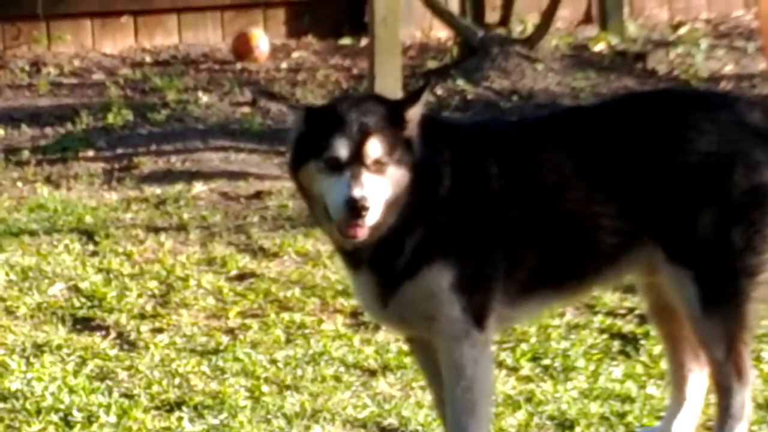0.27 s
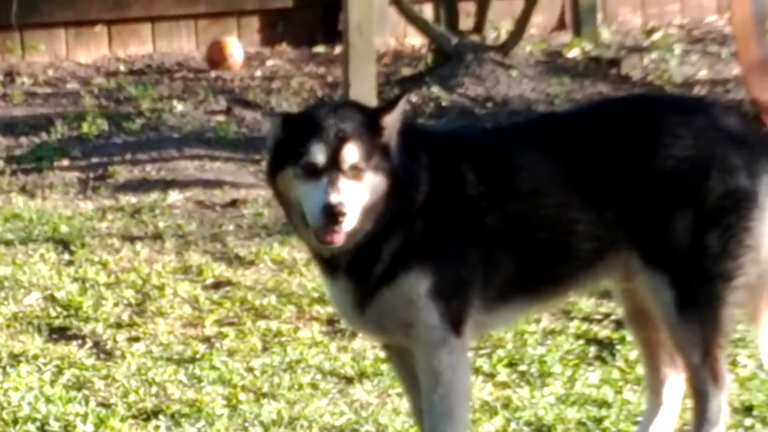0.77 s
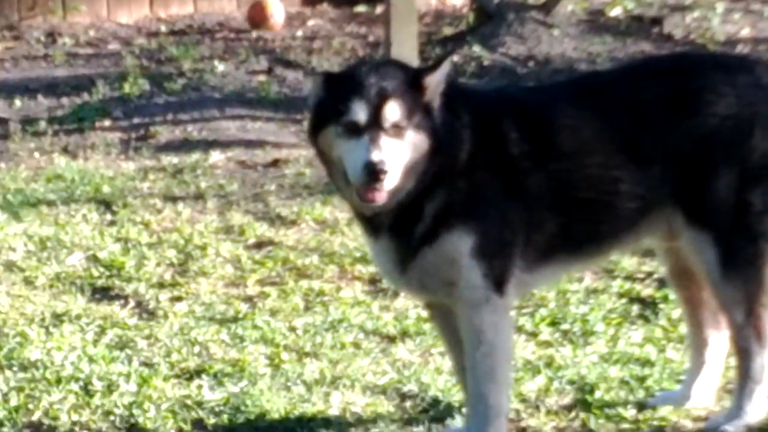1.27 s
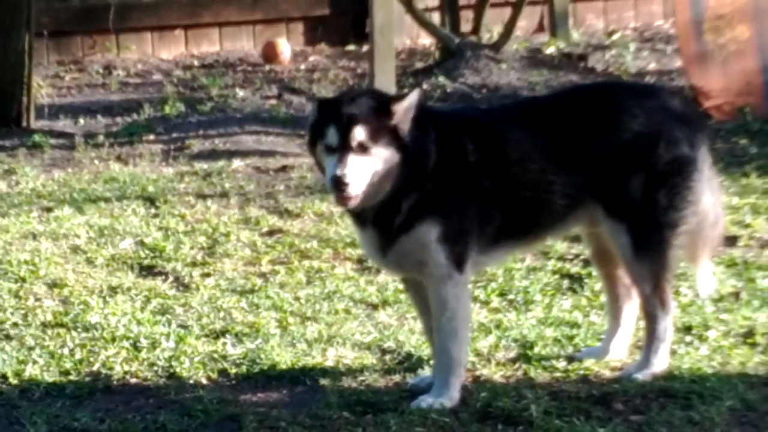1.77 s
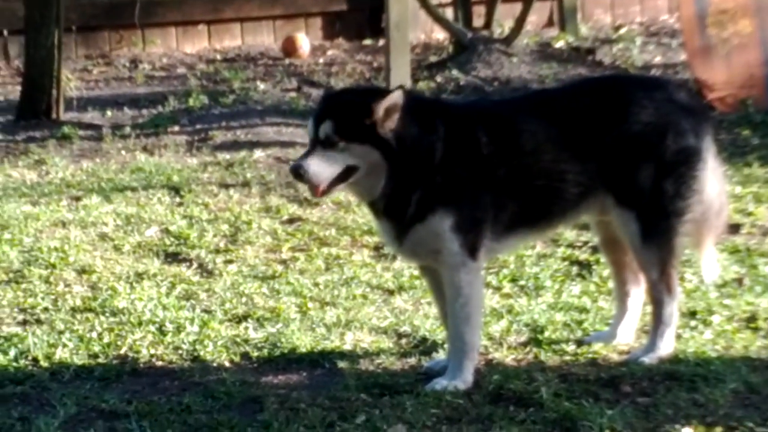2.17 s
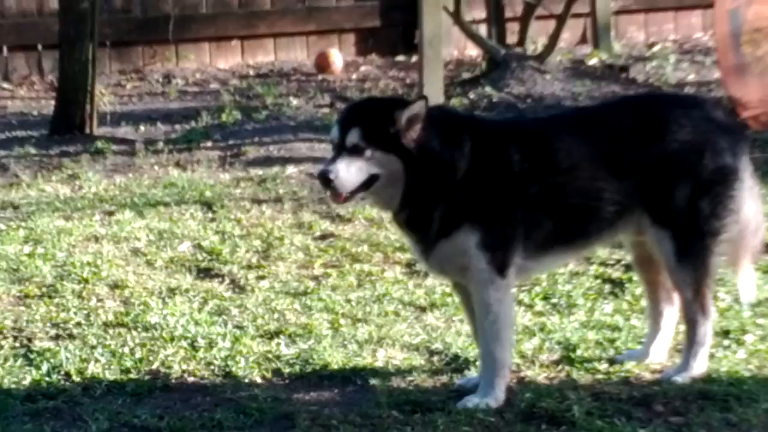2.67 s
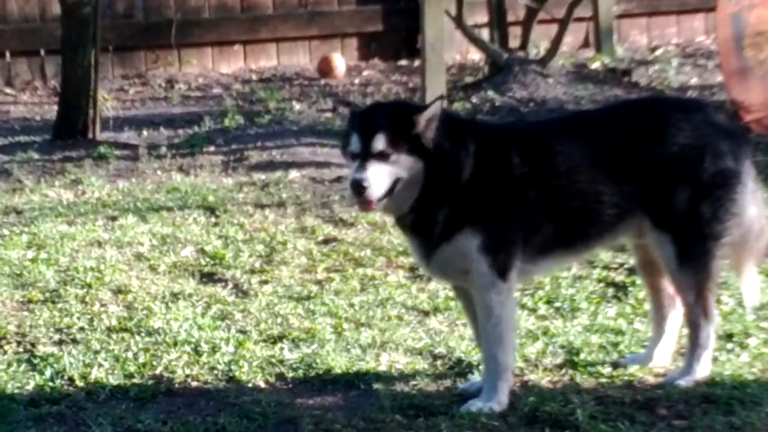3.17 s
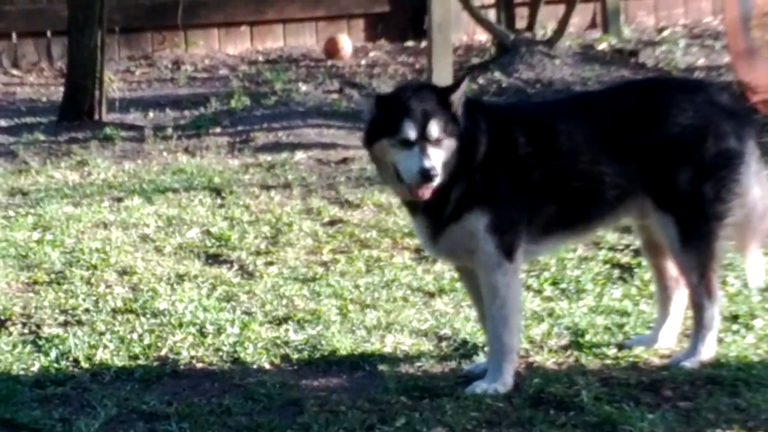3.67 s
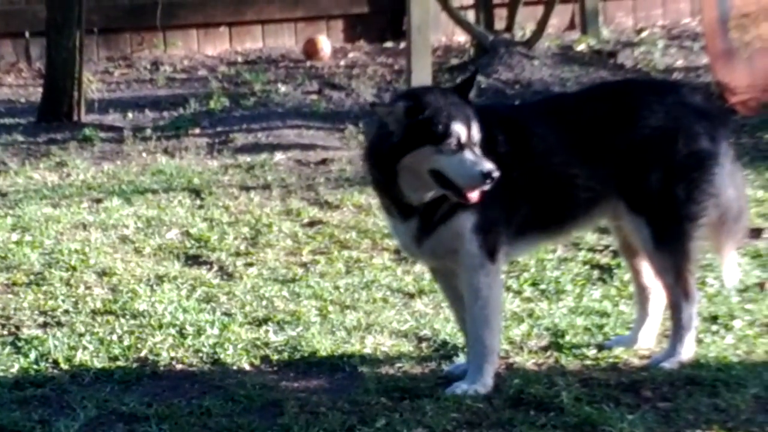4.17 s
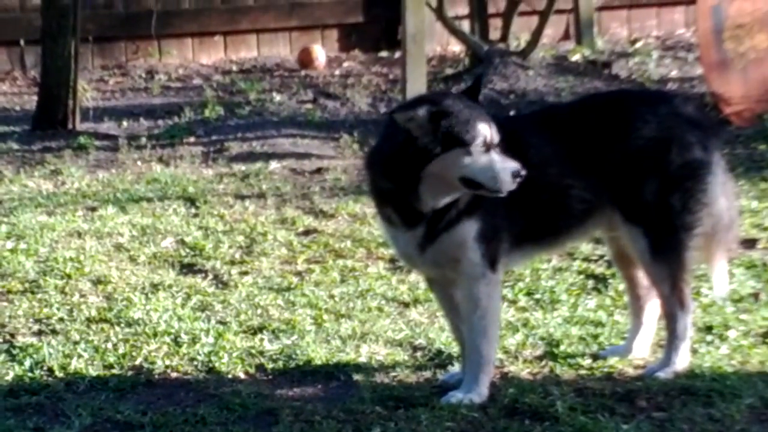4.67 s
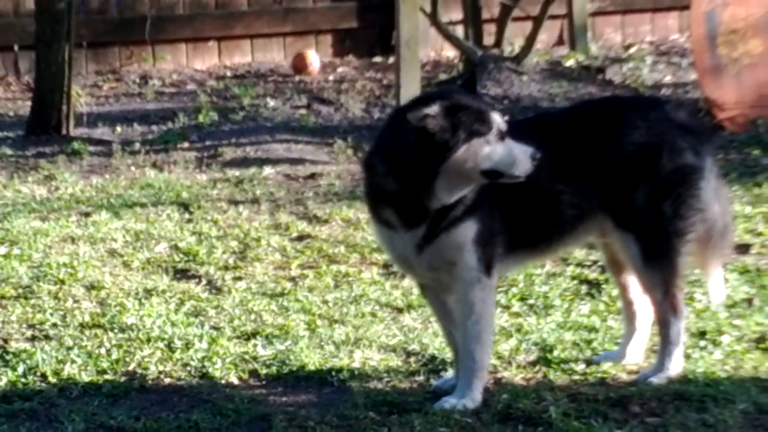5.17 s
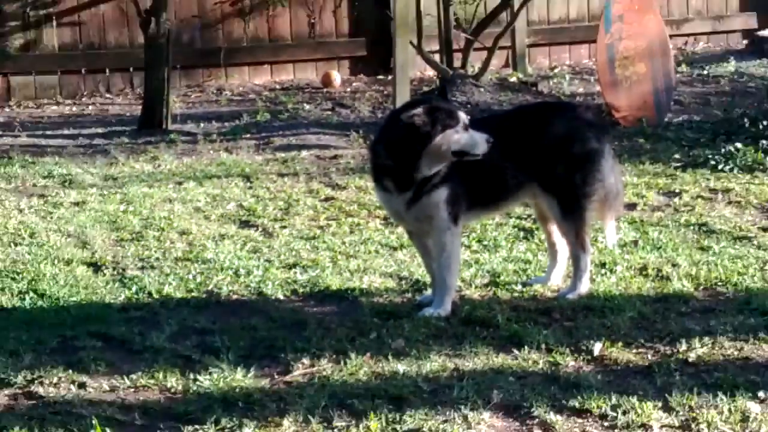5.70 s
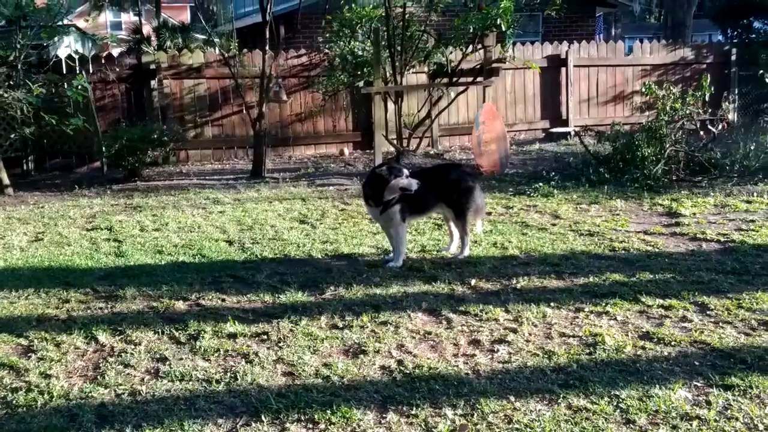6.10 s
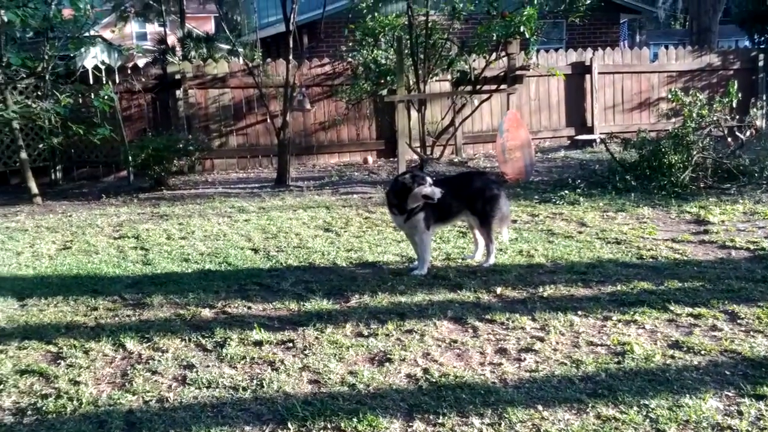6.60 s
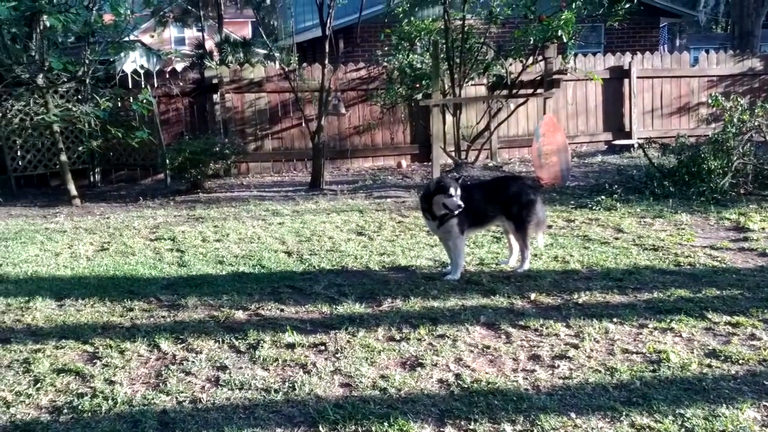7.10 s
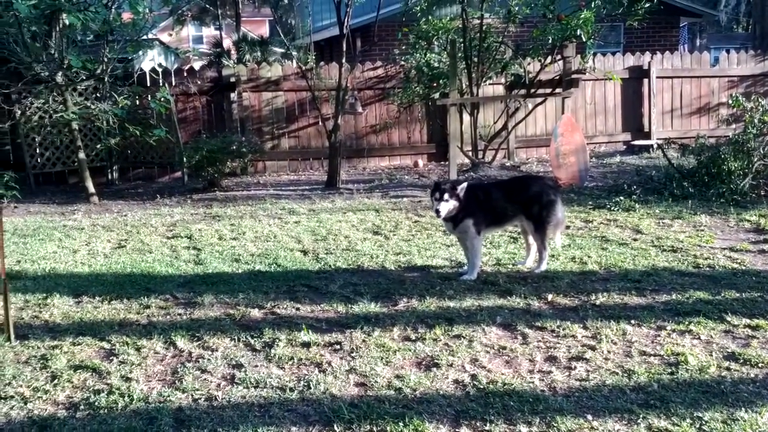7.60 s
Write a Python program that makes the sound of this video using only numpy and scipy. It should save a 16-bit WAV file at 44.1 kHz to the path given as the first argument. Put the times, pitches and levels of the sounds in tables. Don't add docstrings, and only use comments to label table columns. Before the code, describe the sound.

From 0 s an impact sprinkler in a fenced yard rattles rapidly, about 37 tiny dry metallic strikes a second, bright and short, blurred together by hissing spray, a thin metal buzz and scattered droplet ticks. A deep quiet motor sputters for the first half second, settles to an idle and dies around 2.3 s. A faint distant horn blips at 0.7 s; a far bird gives short rising whistles from 0.8 to 3.8 s. A small tap falls near 1 s. The rattle grows gradually until, at 4 s, it abruptly reverses to slower, sharper strikes, about 14 a second, each with a separate burst of spray and light bounces. These get louder and brighter toward 7.8 s. Hard little knocks come at 5.4 to 5.5 s, and a tap with a dull microphone bump at 7.1 s. Soft town rumble, hum and airy hiss remain underneath.

```python
import sys
import numpy as np
from scipy import signal
from scipy.fft import rfft, irfft
from scipy.io import wavfile
from scipy.ndimage import uniform_filter1d

SR = 44100
rng = np.random.default_rng(int(sys.argv[2]) if len(sys.argv) > 2 else 0)


def decibels_to_gain(level_db):
    exponent = np.asarray(level_db, float) / 20
    return 10 ** exponent


def dump_mix(stems):
    frames = np.atleast_2d(stems).T
    limited = np.clip(frames, -1, 1)
    pcm = np.round(limited * 32767).astype(np.int16)
    wavfile.write(sys.argv[1], SR, pcm)


N = 346185
TIME = np.arange(N) / SR
REVERSE_S = 4.02


def ring(times, db, modes, scatter_db, size, contact_s=0.00034):
    hz, mode_db, t60 = np.array(modes, float).T[:, None, :, None]
    chance = rng.standard_normal((len(times), len(modes), 2))
    start = np.ceil(times * SR)
    t = np.arange(size) / SR + (start / SR - times)[:, None, None]
    gain = decibels_to_gain(mode_db + scatter_db * chance[..., :1] - 60 * t / t60)
    detuned_hz = hz * (1 + .005 * chance[..., 1:])
    waves = (gain * np.sin(2 * np.pi * detuned_hz * t)).sum(axis=1)
    waves *= decibels_to_gain(db)[:, None] * (1 - np.exp(-t[:, 0] / contact_s))
    place = np.clip(start[:, None] + np.arange(size), -1, N).astype(int) % (N + 1)
    return np.bincount(place.ravel(), waves.ravel(), N + 1)[:N]


def walk(rate_hz):
    hold = int(SR / rate_hz)
    steps = np.repeat(rng.standard_normal(N // hold + 1), hold)
    return 1.254 * uniform_filter1d(uniform_filter1d(steps, hold), hold)[:N]


def colour(x, points):
    hz, db = np.transpose(points)
    f = np.maximum(np.arange(N // 2 + 1) * SR / N, 1)
    gain_db = np.interp(np.log(f), np.log(hz), db, db[0] - 3.5, db[-1] - 3)
    y = irfft(rfft(x) * decibels_to_gain(gain_db), N)
    return y / np.sqrt(np.mean(y ** 2))


# f/Hz, level/dB per Hz
RUMBLE_SPECTRUM = [(14, -37), (22, 0.5), (55, 4), (113, -3.5), (230, -10.5), (330, -20), (500, -27.5)]
# f/Hz, level/dB per Hz
HISS_SPECTRUM = [(150, -44), (250, -18.5), (343, -22), (768, -16), (1500, -20.5), (2350, -26),
                 (3000, -20.5), (4430, -21), (5280, -19), (6520, -12), (7600, -16.5), (9090, -19.5),
                 (13800, -22.5), (16200, -46)]
# f/Hz, swell rate/Hz, level/dB
HUM_LINES = [(120, 12, -53), (60, 8, -58), (986, 3, -71), (1044, 3, -72), (1217, 3, -71)]


def yard():
    out = decibels_to_gain(-48 + 0.56 * walk(2.8)) * colour(rng.standard_normal(N), RUMBLE_SPECTRUM)
    out += decibels_to_gain(-45 + 0.51 * walk(3.09)) * colour(rng.standard_normal(N), HISS_SPECTRUM)
    for hz, swell_hz, db in HUM_LINES:
        phase = 2 * np.pi * np.cumsum(hz + 2.5 * walk(4)) / SR
        out += decibels_to_gain(db + 2.5 * walk(swell_hz)) * np.sin(phase)
    return out


def motor():
    idle_hz, idle_db, settled_s, stop_s = 36.6, -37, 0.49, 2.25
    first_s, period_s, sputter_db = .09, 0.165, 10
    run_up_db_per_s, sag_db_per_s, fade_db_per_s = 15, 1.3, 90
    early = np.maximum(settled_s - TIME, 0)
    late = np.maximum(TIME - settled_s, 0)
    sputter = (early > 0) * np.sin(np.pi * (TIME - first_s) / period_s) ** 2
    db = idle_db - sputter_db * sputter - run_up_db_per_s * early - sag_db_per_s * late
    db -= fade_db_per_s * np.maximum(TIME - stop_s, 0)
    wobble_db = 1.2 * walk(9)
    return decibels_to_gain(db + wobble_db) * np.sin(2 * np.pi * np.cumsum(idle_hz + 3 * walk(3)) / SR)


# t/s, length/s, start f/Hz, end f/Hz, level/dB
BIRD_NOTES = [(.79, .05, 3500, 3750, -53), (1.28, .06, 2700, 3000, -58), (1.56, .06, 2650, 3050, -57),
              (1.85, .06, 2650, 3000, -56), (2.13, .08, 2550, 2950, -54), (2.39, .08, 2550, 3000, -52),
              (2.71, .09, 2450, 2950, -53), (3.085, .09, 2400, 2900, -53), (3.73, .06, 2450, 2750, -55)]
# delay/s, level/dB
LEAF_ECHOES = [(.011, -7), (.027, -10), (.05, -13)]


def bird():
    out = np.zeros(N)
    for s, length_s, from_hz, to_hz, db in BIRD_NOTES:
        u = np.clip((TIME - s) / length_s, 0, 1)
        cycles = length_s * (from_hz * u + (to_hz - from_hz) * u ** 2 / 2)
        out += decibels_to_gain(db) * np.sin(np.pi * u) * np.sin(2 * np.pi * cycles)
    out = out * decibels_to_gain(2.5 + 3 * walk(200))
    return out + sum(decibels_to_gain(db) * np.roll(out, int(delay_s * SR)) for delay_s, db in LEAF_ECHOES)


# t/s, length/s, f/Hz, level/dB
HORN_BLIP = (.715, .12, 342, -53)


def horn():
    s, length_s, hz, db = HORN_BLIP
    held = np.clip(1.3 * np.sin(np.pi * np.clip((TIME - s) / length_s, 0, 1)), 0, 1)
    return decibels_to_gain(db) * held * np.sin(2 * np.pi * hz * TIME)


# t/s, level/dB, f/Hz, t60/s
TAPS = [(1.052, -27, 2100, 0.0069), (5.4077, -16, 1960, 0.011), (5.4078, -29, 1120, 0.0097),
        (5.4075, -19, 2930, 0.0036), (5.4075, -26, 4100, .003), (5.4084, -32, 655, 0.011),
        (5.472, -40, 2050, .05), (5.503, -48, 2030, .04), (5.536, -35, 3300, 0.0048),
        (5.543, -24, 3380, 0.0037), (5.548, -35, 2980, 0.0043), (6.99, -39, 300, .03),
        (7.1245, -25.5, 1026, 0.0085), (7.1245, -34, 1500, .005)]


def knocks():
    return sum(ring(np.array([s]), np.array([db]), [(hz, 0, t60)], 0, size=1500) for s, db, hz, t60 in TAPS)


# t/s, level/dB, half length/s
CASE_THUMP = (7.1247, -12.5, .0013)


def thump():
    s, db, half_s = CASE_THUMP
    u = (TIME - s) / half_s
    push = -2 * u / (1 + u ** 2) ** 2.1
    sway = 0.094 * np.exp(-((u - 5.5) / 4.0) ** 2) - 0.44 * np.exp(-((u + 3) / 1.4) ** 2)
    return decibels_to_gain(db) * (push + sway)


# t/s, strike peak level/dB, facing/0-1
TURN = [(0, -18, 0.57), (.8, -18.5, .95), (1.6, -15.5, 0.9), (2.4, -13, 0.57), (2.95, -11.5, 0),
        (3.3, -14, 0.1), (3.98, -15.5, 0.44), (4.05, -11, 0), (4.4, -9.5, 0.04), (4.8, -9.5, 0.74),
        (5.6, -8.5, 1), (6.4, -6, 0.9), (7.1, -6, 0.97), (7.85, -7, 1)]
# fast turned away/dB, fast facing/dB, slow turned away/dB, slow facing/dB
ASPECT = [
    (-2.5, 3.5, -22.5, 4.5),
    (-0.1, 1, 2, -1.54),
    (-9.5, 14, 1.5, 1),
    (-22.5, 6, 6.5, 6),
    (-0.26, -0.2, -5, -7.5),
    (7, -16, 4.5, 7),
    (-15, 5, 14, 3),
]
PARTS = ["upper ring", "body", "stem", "edge", "spray", "droplets", "tick"]


def turned(times, part):
    facing = np.interp(times, np.array(TURN)[:, 0], np.array(TURN)[:, 2])
    fast_away, fast_facing, slow_away, slow_facing = ASPECT[PARTS.index(part)]
    fast_db = fast_away + (fast_facing - fast_away) * facing
    slow_db = slow_away + (slow_facing - slow_away) * facing
    return np.where(times < REVERSE_S, fast_db, slow_db)


def droplets(per_s=350):
    chance = rng.random((int(per_s * N / SR), 2)).T
    times = chance[0] * N / SR
    db = -45 - 3 * np.log(chance[1] + .02) + turned(times, "droplets")
    modes = [(6620, -4, 0.005), (7150, -5.5, 0.0044), (6920, -2, 0.0055),
             (7850, -11, 0.0061), (4410, -9.5, 0.0068)]
    return ring(times, db, modes, scatter_db=4.5, size=300)


# f/Hz, level/dB
SPRAY_SPECTRUM = [(2200, -21), (3300, -14), (3930, -10.5), (4230, -12), (4580, -10.5), (5300, -11.5),
                  (6000, -8), (6700, -8), (8500, -8.5), (11000, -7), (13500, -14.5), (16000, -27)]


def spray(strikes, db, lead_s, hold_s, fade_s):
    times = np.array(strikes)[:, 0] - lead_s
    since = TIME - times[np.clip(np.searchsorted(times, TIME) - 1, 0, None)]
    gate = (since > 0) * np.exp(-np.maximum(since - hold_s, 0) / fade_s)
    grain = decibels_to_gain(3.3 * walk(1500))
    return decibels_to_gain(db + turned(TIME, "spray")) * gate * colour(grain * rng.standard_normal(N), SPRAY_SPECTRUM)


# f/Hz, level/dB
BUZZ_SPECTRUM = [(3500, -24), (3930, -4), (4230, -14), (4600, 0), (4950, -16), (5300, -24)]


def buzz(db):
    on = uniform_filter1d(1. * (TIME < REVERSE_S - .015), size=800)
    level_db = db + turned(TIME, "body") + 1.77 * walk(120)
    return decibels_to_gain(level_db) * on * colour(rng.standard_normal(N), BUZZ_SPECTRUM)


# strike number, t/s
FAST_PACE = [(-1, -.0005), (25, .6933), (48, 1.3103), (80, 2.1633), (113, 3.0393), (149, 3.985)]
SLOW_PACE = [(0, 4.0543), (12, 4.888), (25, 5.7891), (38, 6.6958), (54, 7.8138)]


def swings(pace, spread_s, scatter_db):
    number, s = np.transpose(pace)
    chance = np.clip(rng.standard_normal((int(number[-1] - number[0]) + 1, 2)).T, -2, 2)
    times = np.interp(np.arange(number[0], number[-1] + 1), number, s) + spread_s * chance[0]
    peak_db = np.interp(times, np.array(TURN)[:, 0], np.array(TURN)[:, 1])
    return np.transpose([times, peak_db + scatter_db * chance[1]])


# f/Hz, level/dB, t60/s
MAIN_RING = [(6592, 2, 0.0081), (6180, -22, 0.014)]
UPPER_RING = [(7010, -2, 0.0076), (7450, -20, 0.019)]
STEM = [(2030, -27.5, 0.0034), (2512, -34.5, 0.0093)]
EDGE = [(8370, -22.5, 0.014), (8840, -21.5, 0.0059), (9930, -20, .007), (10450, -20, 0.0087),
        (11220, -22, 0.0069), (12200, -29, 0.0046), (13200, -27, .005), (14600, -28, 0.0044)]


def head(times, db, body, scatter_db, contact_s, size):
    out = ring(times, db, MAIN_RING, 0.38, size, contact_s)
    out += ring(times, db + turned(times, "upper ring"), UPPER_RING, 0.37, size, contact_s)
    out += ring(times + 0.00028, db + turned(times, "body"), body, scatter_db, size)
    out += ring(times + .0001, db + turned(times, "stem"), STEM, scatter_db, size)
    return out + ring(times - .0003, db + turned(times, "edge"), EDGE, scatter_db, size // 2)


# f/Hz, level/dB, t60/s
FAST_BODY = [(3300, -34, 0.006), (3720, -49, 0.0074), (3920, -17, 0.008), (4020, -21, 0.0089),
             (4470, -15.5, 0.0076), (5100, -31, 0.0055), (5780, -18.5, 0.011)]
SLOW_BODY = [(3300, -35, 0.012), (3530, -28, 0.016), (4073, -20.5, 0.017), (4290, -20.5, 0.018),
             (4396, -17.5, 0.016), (4930, -21.5, 0.019), (5560, -20, 0.0094)]
# f/Hz, level/dB, t60/s
TICK = [(8500, -6, .003), (10000, -3, .003), (11500, 0, .003), (13000, -4, .003), (15000, -9, .002)]
# delay/s, timing spread/s, ring level/dB, tick level/dB
FAST_TOUCH = [
    (-.0031, .0003, -25, -17),
    (.0097, .0003, -25, -11),
    (.0119, .0002, -28, -10),
]
SLOW_TOUCH = [
    (-.0017, 0.00018, -60, -29),
    (.006, 0.0012, -25, -44),
    (0.0092, 0.000396, -43, -19),
]


def arm(strikes, touches, body, gain_db, lag_s, scatter_db, contact_s, crack_db):
    times, db = np.transpose(strikes)
    times = times + lag_s
    out = head(times, db + gain_db, body, scatter_db, contact_s, size=700)
    out += ring(times - .0004, db + crack_db + turned(times, "edge"), TICK, scatter_db=3.0, size=150)
    touched_modes = MAIN_RING + UPPER_RING + body[2:5]
    for delay_s, spread_s, ring_db, tick_db in touches:
        chance = rng.standard_normal((len(times), 2)).T
        when = times + delay_s + spread_s * chance[0]
        force_db = db + 3 * chance[1]
        out += ring(when, force_db + ring_db, touched_modes, scatter_db=0.0, size=350)
        out += ring(when, force_db + tick_db + turned(when, "tick"), TICK, scatter_db=0.5, size=150)
    return out


def scene():
    background = yard() + motor() + bird() + horn() + knocks() + thump()
    fast = swings(FAST_PACE, spread_s=.0003, scatter_db=1.1)
    slow = swings(SLOW_PACE, spread_s=.00025, scatter_db=.6)
    wet = spray(fast, db=-37.0, lead_s=.0015, hold_s=0.017, fade_s=0.00073) * (TIME < REVERSE_S)
    wet += spray(slow, db=-32.0, lead_s=0.0026, hold_s=0.011, fade_s=0.0032)
    sprinkler = arm(fast, FAST_TOUCH, FAST_BODY, gain_db=1.5, lag_s=0.000297, scatter_db=1.0,
                    contact_s=0.00045, crack_db=-20)
    sprinkler += arm(slow, SLOW_TOUCH, SLOW_BODY, gain_db=0.0, lag_s=0.00028, scatter_db=2.5,
                     contact_s=0.00023, crack_db=-19.0)
    return (background + droplets() + wet + buzz(db=-49.5) + sprinkler)[None]


# f/Hz, level/dB
MIC_RESPONSE = [(20, 1), (13800, -1.5), (14700, -4.5), (15400, -1), (22000, 0)]


def low_pass(x):
    return signal.sosfilt(signal.butter(12, 16960, fs=SR, output="sos"), x)


def record(dry):
    level = np.sqrt(np.mean(dry ** 2))
    heard = np.tanh(colour(dry[0], MIC_RESPONSE) * level)
    top_cut = signal.ellip(7, .3, 32, 15750, fs=SR, output="sos")
    return low_pass(signal.sosfilt(top_cut, heard)[None])


dry = scene()
out = record(dry)
dump_mix(out)
```